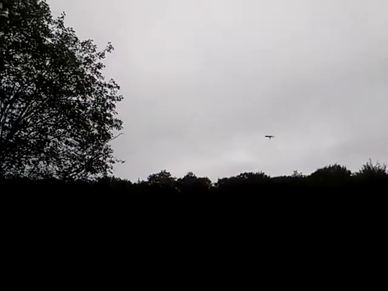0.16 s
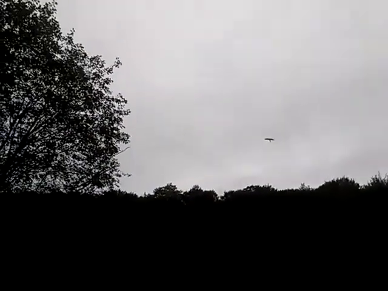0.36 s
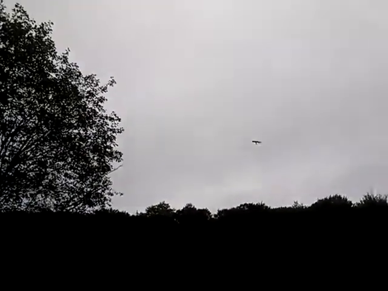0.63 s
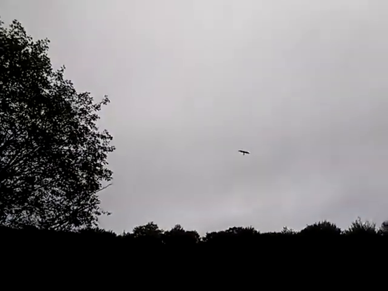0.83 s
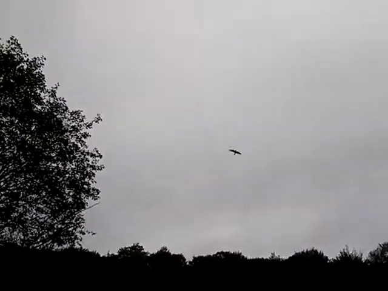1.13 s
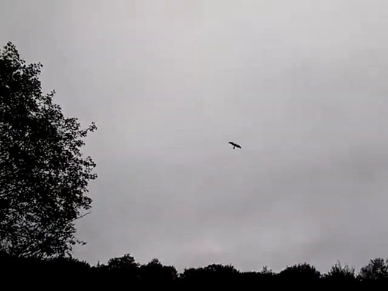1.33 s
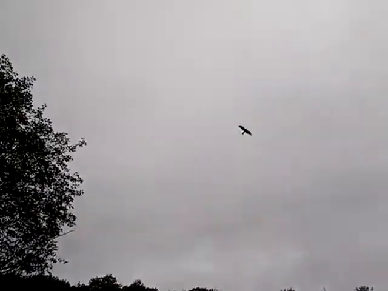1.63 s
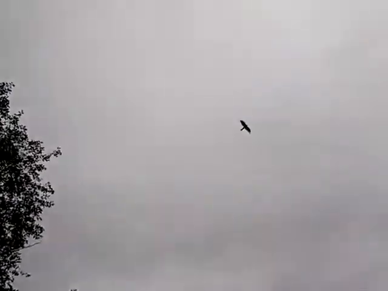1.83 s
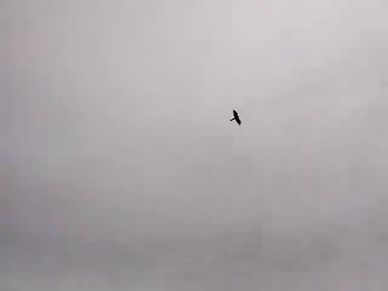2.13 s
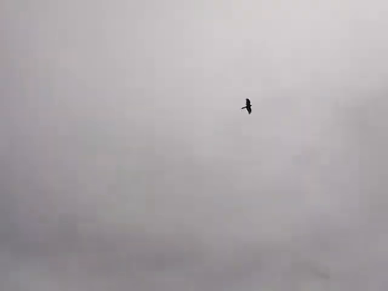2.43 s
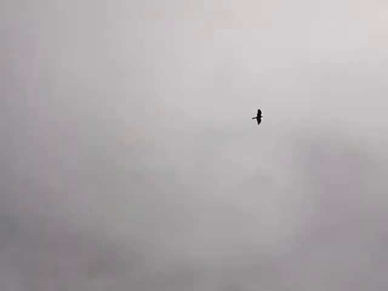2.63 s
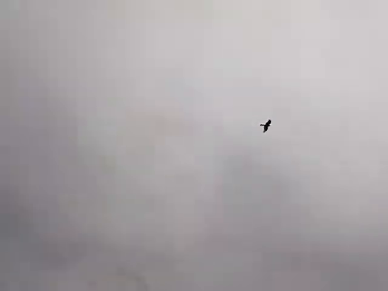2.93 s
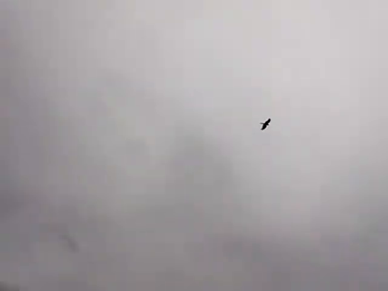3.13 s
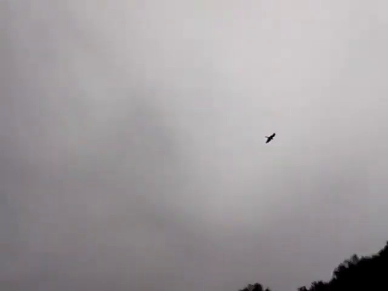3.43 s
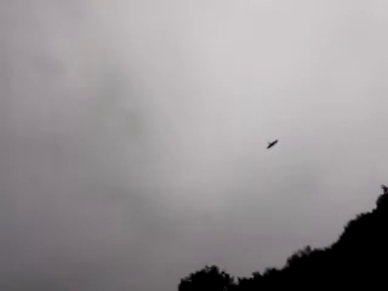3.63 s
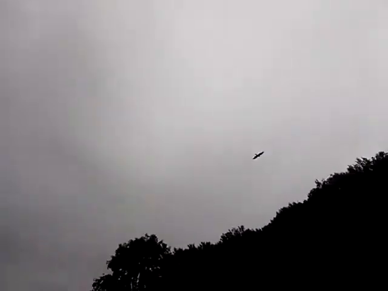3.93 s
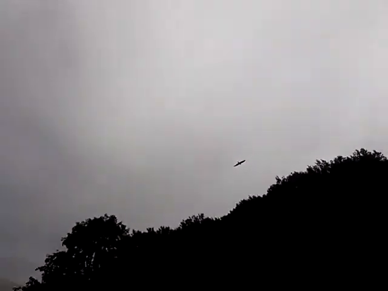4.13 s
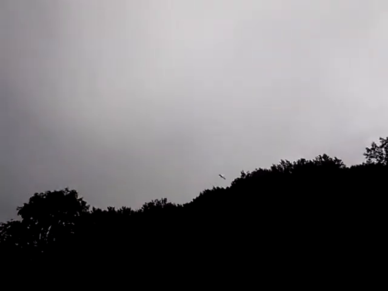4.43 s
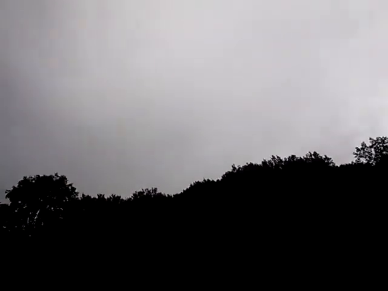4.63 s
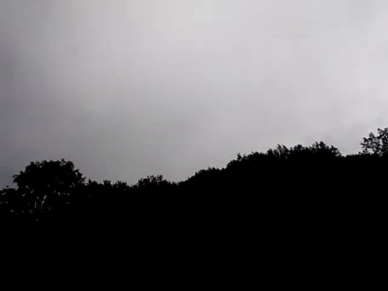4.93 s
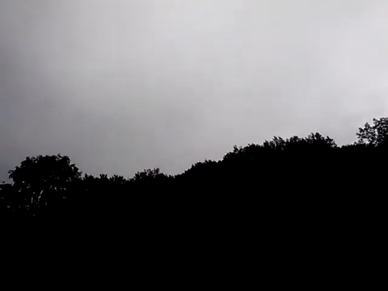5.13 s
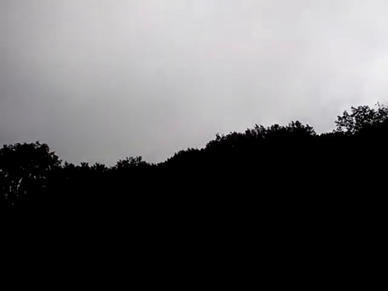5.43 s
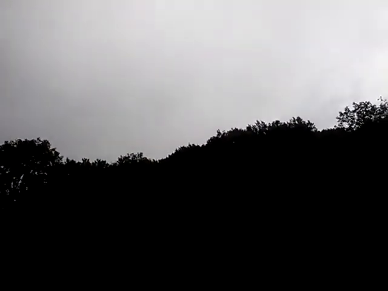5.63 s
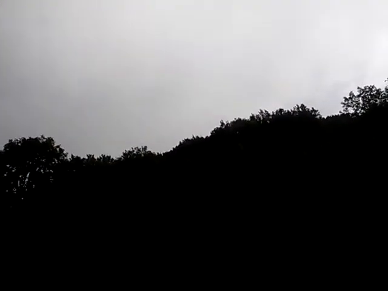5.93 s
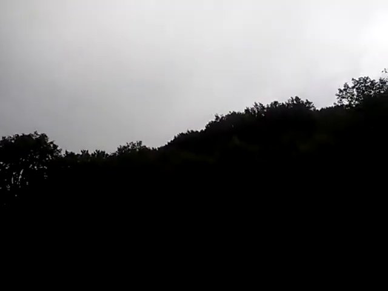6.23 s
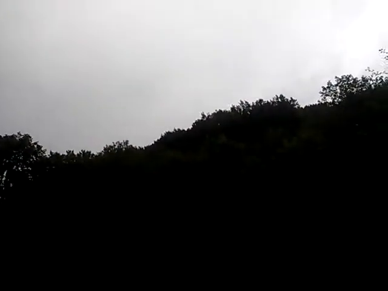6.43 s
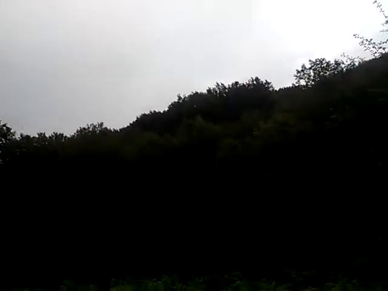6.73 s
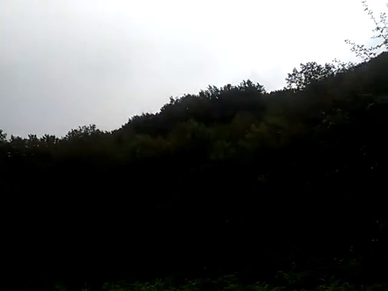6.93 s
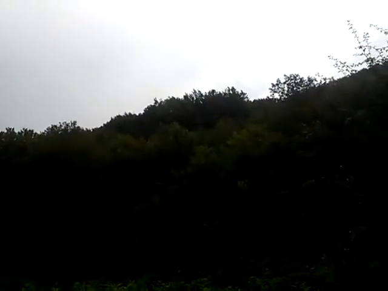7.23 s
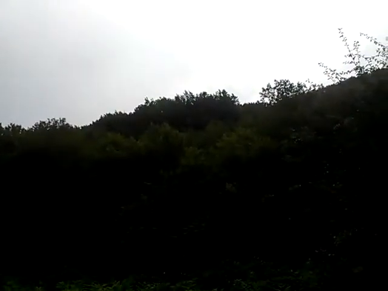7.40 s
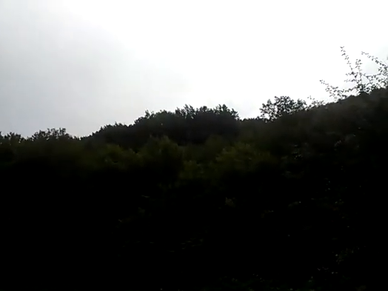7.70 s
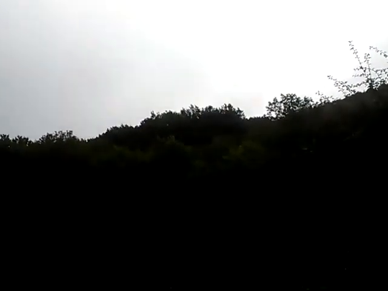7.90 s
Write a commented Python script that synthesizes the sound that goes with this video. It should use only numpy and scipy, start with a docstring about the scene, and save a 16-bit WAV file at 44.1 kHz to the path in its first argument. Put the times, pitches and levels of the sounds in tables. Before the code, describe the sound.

A soaring bird of prey gives five high arched mewing whistles over a wooded hillside, with close handling knocks, ticking plastic and late cloth rustle.

```python
"""Mewing bird of prey over a wooded hillside

A soaring bird gives five arched calls, harmonic whistles with a rough period-doubled undertone; trees and
hillside reflect them, and the last two, from low over the trees, are blurred. Close to the microphone, fingers
knock on a hand-held camera (damped swings), its case chatters (ringing modes) and clothing rustles (grainy noise).
Behind lie a hush of air and leaves (coloured noise) and the camera's faint whine (a wavering sine), in mono."""
import sys
import numpy as np
from scipy import signal
from scipy.fft import rfft, irfft, next_fast_len
from scipy.io import wavfile

SR = 44100
rng = np.random.default_rng(int(sys.argv[2]) if len(sys.argv) > 2 else 0)


def dump_mix(stems):
    """Bounce the given channels to the path in sys.argv[1] as a 16-bit WAV at rate SR."""
    frames = np.atleast_2d(stems).T  # one column per channel
    limited = np.clip(frames, -1, 1)  # hard clip at full scale
    pcm = np.round(limited * 32767).astype(np.int16)
    wavfile.write(sys.argv[1], SR, pcm)


N = 355438
TIME = np.arange(N) / SR


def undb(db):
    """Decibels to gain."""
    return 10 ** (np.asarray(db) / 20)


def unit(x):
    """Scale to rms 1."""
    return x / np.sqrt(np.mean(x ** 2))


def curve(points, t=TIME):
    """Join (seconds, value) points by straight lines."""
    seconds, values = np.transpose(points)
    return np.interp(t, seconds, values)


def tint(x, spectrum):
    """Give x a spectrum of (Hz, dB) points, joined on a logarithmic frequency axis; rms 1."""
    hz, db = np.transpose(spectrum)
    size = next_fast_len(len(x))
    f = np.maximum(np.fft.rfftfreq(size, 1 / SR), 1)
    gain = undb(np.interp(np.log(f), np.log(hz), db))
    return unit(irfft(rfft(x, size) * gain, size)[:len(x)])


def band(hz, width, size=N):
    """Noise that falls away on both sides of hz; at 0 Hz it is a random wander. Rms 1."""
    padded = next_fast_len(size)
    f = np.fft.rfftfreq(padded, 1 / SR)
    spectrum = rfft(rng.standard_normal(padded)) / (1 + ((f - hz) / width) ** 2)
    return unit(irfft(spectrum, padded)[:size])


def add(out, start, x):
    """Mix x into out from a time in seconds."""
    i = max(int(start * SR), 0)
    out[i:i + len(x)] += x[:max(len(out) - i, 0)]


def scatter(start, end, per_s, count=40):
    """Unevenly spaced moments in a spell: rows of (s, chance of strength, chance of pitch)."""
    times = start + (np.arange(count) + rng.random(count)) / per_s
    return np.column_stack([times, rng.standard_normal((count, 2))])[times < end]


def background(leaf_hz=6050, leaf_width_hz=750, whine_hz=13015, whine_db=-81.5):
    """A flickering hush of air, the hiss of far leaves, and the thin whine of the camera's electronics."""
    # Spectrum of the air and leaves. Each row: frequency in Hz, relative density in dB per Hz.
    air_colour = [(15, -42), (25, -2), (193, -8), (233, -7.5), (378, -6), (598, -4), (666, -3), (722, -3.5),
                  (1950, -3), (2700, -8), (3930, -7), (4870, -11.5), (5880, -8.5), (7100, -16),
                  (15500, -23)]
    # Loudness of that hush. Each row: time in seconds, level in dB.
    air_level = [(0, -63), (3.5, -63.5), (6, -61.5), (8.05, -63)]
    # Loudness of the far leaves. Each row: time in seconds, level in dB.
    leaf_level = [(0, -95), (2.5, -76), (2.9, -72), (8.05, -71.5)]
    flicker_db = .35 * band(0, 12)
    air = tint(rng.standard_normal(N), air_colour) * undb(curve(air_level) + flicker_db)
    leaves = band(leaf_hz, leaf_width_hz) * undb(curve(leaf_level) + flicker_db)
    wavering_hz = whine_hz + 5 * band(0, 10)
    whine = np.sqrt(2) * np.sin(2 * np.pi * np.cumsum(wavering_hz) / SR)
    return air + leaves + undb(whine_db) * whine


def rustle(grain_db=0.5, crackle_db=1.2, catch_db=1.0, growth=0.53):
    """Cloth fibres catch and let go, heard as uneven, grainy noise: long slides and short brushes."""
    # Slides of a sleeve, each gathering speed until it stops.
    # Each row: start in seconds, stop in seconds, level at the stop in dB, release in seconds.
    slides = [(6.55, 7.207, -59.5, 0.029), (7.258, 7.639, -46, 0.044), (7.636, 8.043, -70, 0.046)]
    # Spectrum of the sleeve. Each row: frequency in Hz, relative density in dB per Hz.
    sleeve_colour = [(150, -39), (400, -11.5), (800, -12), (2400, -12.5), (3700, -2), (5600, 0),
                     (7000, -4.5), (8100, -11.5), (8800, -21.5), (15000, -28)]
    # Short brushes of cloth. Each row: middle in seconds, half length in seconds, level in dB, centre in Hz.
    cloth_brushes = [(2.963, 0.0066, -61, 4740), (3.943, 0.0034, -57, 6500), (6.419, 0.032, -52, 5190),
                     (6.466, 0.062, -52.5, 4970), (6.896, .03, -59, 4900), (7.209, 0.0079, -51.5, 4850),
                     (7.296, 0.0062, -50, 3170), (7.394, 0.007, -49, 5140), (7.503, .035, -53, 6070),
                     (7.621, 0.046, -52.5, 3880), (7.754, 0.064, -60.5, 5330)]
    grain = unit(undb(grain_db * band(0, 1200) + crackle_db * band(0, 180)))

    speed = np.zeros(N)
    for start, stop, db, release in slides:
        gathering = np.clip((TIME - start) / (stop - start), 0, 1) ** growth
        dying = np.exp(-np.maximum(TIME - stop, 0) / release)
        speed += undb(db) * gathering * dying
    out = speed * tint(rng.standard_normal(N), sleeve_colour) * undb(catch_db * band(0, 35))

    t = np.arange(int(.3 * SR)) / SR
    middle = t.mean()
    for s, half_length, db, hz in cloth_brushes:
        stroke = np.exp(-((t - middle) / half_length) ** 2)
        add(out, s - middle, undb(db) * stroke * band(hz, 0.32 * hz, len(t)))
    return out * grain


def chatter(half_length_s=0.0043, slips_per_s=41, light_db=4, scatter_db=3, detune_hz=35,
            rub_db=-2, patchy_db=3, rub_fade_s=0.024):
    """Small slips swell the case's ring for a few milliseconds each, over a weak, uneven rubbed ring."""
    # Distinct slips in the camera case. Each row: middle in seconds, level in dB.
    distinct_slips = [(.082, -52), (4.546, -55), (4.566, -47), (4.579, -42.5), (4.589, -47), (4.645, -44.5),
                      (4.73, -46), (4.74, -48), (4.802, -50.5), (5.778, -55), (5.872, -58), (5.94, -51),
                      (5.951, -52), (6.893, -45.5), (7.089, -53.5), (7.207, -52), (7.333, -50),
                      (7.471, -49)]
    # What the case rings with. Each row: frequency in Hz, width in Hz, relative level in dB.
    case_modes = [(3470, 115, 2.5), (8000, 340, -19.5), (13300, 300, -25)]
    # Spells of light rubbing. Each row: start in seconds, end in seconds, base level in dB.
    rubbing_spells = [(0.019, .16, -70), (3.42, 3.5, -70.5), (4.513, 4.662, -58), (4.728, 4.842, -61.5),
                      (5.738, 5.79, -63), (5.819, 6.079, -69.5), (6.108, 6.564, -61.5),
                      (6.867, 6.96, -59.5), (7.057, 7.095, -61.5), (7.179, 7.227, -60),
                      (7.28, 7.385, -60.5), (7.45, 8.056, -72.5)]
    light_slips = []
    for start, end, db in rubbing_spells:
        for s, strength, _ in scatter(start, end, slips_per_s):
            light_slips.append((s, db + light_db + scatter_db * strength))

    slips, t = np.zeros(N), np.arange(int(0.035 * SR)) / SR
    middle = t.mean()
    swell = np.exp(-((t - middle) / half_length_s) ** 2)
    for s, db in [*distinct_slips, *light_slips]:
        turn, detune = rng.standard_normal(2)  # starting phase in turns, shared shift of the modes
        ring = sum(undb(mode_db) * np.sin(2 * np.pi * ((hz + detune_hz * detune) * t + turn))
                   for hz, _, mode_db in case_modes)
        add(slips, s - middle, undb(db) * swell * ring)

    pressure = np.zeros(N)
    for start, end, db in rubbing_spells:
        time_outside = abs(TIME - np.clip(TIME, start, end))
        pressure = np.maximum(pressure, undb(db) * np.exp(-time_outside / rub_fade_s))
    rubbed = sum(undb(db) * band(hz, width) for hz, width, db in case_modes)
    return slips + rubbed * pressure * undb(rub_db + patchy_db * band(0, 29))


def knocks(rise_cycles=0.26, thud_db=-11, thud_ratio=0.604, thud_decay_s=0.0089, flurry_per_s=44, flurry_hz=292,
           scatter_db=1.0, pitch_scatter=0.49, grip_db=-81, grip_swing_db=4.0):
    """Each knock swings the camera body for about a cycle, with a brief lower thud; the grip murmurs throughout."""
    # Distinct finger knocks on the camera body. Each row: start in seconds, level in dB, pitch in Hz.
    distinct_knocks = [(0.364, -46.5, 233), (.4222, -50, 243), (.69, -42.5, 218), (0.7212, -45.5, 257),
                       (.862, -56, 129), (1.7897, -36.5, 268), (1.796, -36.5, 477), (1.8228, -41, 368),
                       (1.8805, -44, 388), (1.962, -42.5, 400), (2.0315, -43.5, 420), (2.1533, -45, 305),
                       (2.5498, -38, 363), (2.768, -45, 395), (2.8457, -41.5, 332), (3.2827, -55, 230),
                       (3.8855, -42.5, 276), (3.9831, -45.5, 258), (4.2036, -43, 516), (4.3688, -42, 308),
                       (5.4072, -49, 410), (5.4536, -53.5, 148), (5.715, -38, 355), (7.348, -49, 280),
                       (7.6478, -43.5, 226)]
    # The grip shifts in flurries of lighter knocks. Each row: start in seconds, end in seconds, typical level in dB.
    grip_flurries = [(1.836, 2.06, -45), (2.094, 2.235, -49), (2.517, 2.65, -48), (2.736, 2.87, -49.5),
                     (3.985, 4.015, -46.5)]
    light_knocks = []
    for start, end, db in grip_flurries:
        for s, strength, pitch in scatter(start, end, flurry_per_s):
            hz = flurry_hz * np.exp(pitch_scatter * np.tanh(pitch))
            light_knocks.append((s, db + scatter_db * strength, hz))

    out, t = np.zeros(N), np.arange(int(0.064 * SR)) / SR
    for s, db, hz in [*distinct_knocks, *light_knocks]:
        age = t * hz / rise_cycles
        swing = age * np.exp(1 - age) * np.cos(2 * np.pi * hz * t)
        # the thud follows the pitch of the knock, and a firmer grip raises it
        firmness = rng.standard_normal()
        thud_hz = thud_ratio * hz * np.exp(0.17 * firmness)
        thud = np.exp(-t / thud_decay_s) * np.sin(2 * np.pi * thud_hz * t)
        add(out, s, undb(db) * (swing - undb(thud_db) * thud))
    body = signal.sosfilt(signal.butter(1, 40, "high", fs=SR, output="sos"), out)
    grip = undb(grip_db) * unit(band(150, 210) * undb(grip_swing_db * band(0, 16)))
    return body + grip


def brighten(x, hz):
    """Leaves throw back the short waves best: a gentle high-pass."""
    return signal.sosfilt(signal.butter(1, hz, "high", fs=SR, output="sos"), x)


def echoes(x, t60, delay, top_hz):
    """Countless weak reflections off trunks and leaves, building up, fading away and dull in the treble."""
    t = np.arange(int(t60 * SR)) / SR
    response = rng.standard_normal(len(t)) * undb(-60 * t / t60) * (1 - np.exp(-t / delay))
    response /= np.linalg.norm(response)
    response = signal.sosfilt(signal.butter(2, top_hz, fs=SR, output="sos"), response)
    return signal.fftconvolve(x, response)[:N]


def reflections(x, spread, count=24, first=.005, fade=0.36, doppler=.016):
    """Single trees return the call, each with its own delay [s] and, as the bird flies, a slight pitch shift."""
    t = np.arange(len(x) + int(.15 * SR)) / SR
    # a finer time grid keeps the treble when reading between samples
    fine = signal.resample_poly(x, 4, 1)
    fine_t = np.linspace(0, len(x) / SR, len(fine), endpoint=False)
    out = np.zeros(len(t))
    for k, (place, bearing) in enumerate(rng.random((count, 2))):
        delay = first + spread * (k + place) / count
        moving_delay = delay + doppler * (2 * bearing - 1) * (t - t.mean())
        out += np.exp(-delay / fade) * np.interp(t - moving_delay, fine_t, fine, 0, 0)
    out = brighten(out, hz=6040)
    return out * np.linalg.norm(x) / np.linalg.norm(out)


def mew(t, hz, voice, jitter=0.0032, waver=0.0019, undertone_width_hz=210, onset_db=-24, ending_db=-14,
        soft_share=0.24, soft_share_per_harmonic=0.37, strain_range=0.015, strain_lasts=0.7, ragged_db=3,
        upper_undertone_db=3.5, opening_s=0.019, closing_s=.01):
    """One call: a harmonic whistle with a trembling pitch, doubling its period near the top of the arch."""
    # What throat and open beak pass of each harmonic. Each row: frequency in Hz, gain in dB.
    throat_gain = [(1300, -8.5), (1600, -13), (1750, -10), (2600, -10.5), (3150, -10), (3350, -5.5),
                   (3520, 1), (3900, 13), (4700, -1), (5300, 0), (5700, -9), (6350, -8), (7000, -4.5),
                   (7700, -22), (8200, -19.5), (8750, -10), (9400, -26), (10500, -22.5), (12300, -48.5)]
    (level_db, attack, release, first_db, second_db, fourth_db, overtone_db,
     undertone_db, breath_db, flutter_db) = voice
    size = len(t)
    since_start, until_end = t - t[0], t[-1] - t
    pitch = hz * (1 + jitter * band(0, 170, size) + waver * band(0, 27.6, size))
    phase = 2 * np.pi * np.cumsum(pitch) / SR

    # effort rises, holds and falls; a soft voice is poor in overtones
    effort_db = onset_db * np.exp(-since_start / attack) + ending_db * np.clip(1 - until_end / release, 0, 1)
    throat_hz, throat_db = np.transpose(throat_gain)
    harmonics_db = [first_db, second_db, 0, fourth_db, overtone_db, overtone_db, overtone_db]
    tone = np.zeros(size)
    for k, source_db in enumerate(harmonics_db, 1):
        passed_db = np.interp(np.log(k * hz), np.log(throat_hz), throat_db)
        db = source_db + passed_db + effort_db * (soft_share + soft_share_per_harmonic * k)
        # moving air makes each harmonic flutter on its own
        tone += undb(db + flutter_db * band(0, 34, size)) * np.sin(k * phase)

    # the doubling sets in at the top and lingers on the way down
    tension = hz + strain_lasts * (np.maximum.accumulate(hz) - hz)
    strain = np.exp((tension / hz.max() - 1) / strain_range) * undb(undertone_db + effort_db)
    # its lines halfway between the harmonics are ragged
    between = np.zeros(size)
    for k, db in [(2, -upper_undertone_db), (3, upper_undertone_db)]:
        raggedness = (0.77 + band(0, undertone_width_hz, size)) * undb(db + ragged_db * band(0, 22, size))
        between += np.sin((k + .5) * phase) * raggedness

    rasp = undb(breath_db) * band(0, 660, size)
    edges = np.clip(np.minimum(since_start / opening_s, until_end / closing_s), 0, 1)
    return np.sqrt(2) * undb(level_db) * edges * (tone * (1 + rasp) + strain * between)


def bird(hillside_lag_s=.08, carry_range=0.34):
    """The calls, their quick reflections from the tree tops and the later, long wash from the hillside."""
    # The pitch arch of each call. Each row is one call, a list of points: time in seconds, pitch in Hz.
    pitch_arches = [
        [(.25, 1320), (.305, 1535), (.35, 1628), (.46, 1740), (.615, 1777), (.68, 1746), (.78, 1728),
         (.835, 1626), (.865, 1510)],
        [(1.622, 1305), (1.668, 1580), (1.7, 1653), (1.75, 1705), (1.8, 1713), (1.85, 1747), (1.935, 1737),
         (2.07, 1621), (2.13, 1510)],
        [(3.77, 1285), (3.8, 1420), (3.845, 1561), (4.03, 1623), (4.08, 1568), (4.115, 1596), (4.195, 1470)],
        [(4.83, 1290), (4.865, 1480), (4.91, 1585), (5.05, 1705), (5.19, 1741), (5.24, 1750), (5.315, 1703),
         (5.35, 1621), (5.415, 1478)],
        [(6.035, 1372), (6.075, 1543), (6.135, 1660), (6.19, 1716), (6.29, 1751), (6.39, 1662), (6.44, 1744),
         (6.54, 1524)],
    ]
    # The voice in each call. Each row: level in dB, attack in seconds, release in seconds, then in relative dB:
    # fundamental, second harmonic, fourth harmonic, overtones above it, half-pitch undertone, breathiness, flutter.
    call_voices = [(-42.5, 0.049, 0.024, -5, -2, 1, -3.5, -14.5, -33, 2),
                   (-43, 0.026, 0.024, 1, 3.5, 3, 1, -19.5, -28, 2.2),
                   (-45.5, 0.027, 0.052, -3.5, -0.5, -3, -4, -36, -25, 3),
                   (-46, 0.025, 0.012, 0, 0, 1, -1, -22, -25, 2),
                   (-48, 0.024, 0.037, -1.5, -6.5, -0.5, -3.5, -26, -28, 3)]
    # How the wood answers each call. Each row: tree tops in dB re the direct call, spread of their delays
    # in seconds, hillside in dB.
    wood_answers = [(-13.5, 0.053, -19.5), (-15.5, 0.058, -19.5), (-11, 0.047, -21), (-2, .05, -16),
                    (-1.5, .062, -11.5)]
    near, far = np.zeros(N), np.zeros(N)
    for arch, voice, (trees_db, spread, hillside_db) in zip(pitch_arches, call_voices, wood_answers):
        t = np.arange(int(arch[0][0] * SR), int(arch[-1][0] * SR)) / SR
        hz = curve(arch, t)
        call = mew(t, hz, voice)
        # the shrill top of the arch carries farthest
        carried = call * np.exp((hz / hz.max() - 1) / carry_range)
        # the stronger the trees answer, the weaker the direct call and its reflections are set
        direct = 1 / np.hypot(1, undb(trees_db))
        add(near, t[0], direct * call)
        add(near, t[0], direct * undb(trees_db) * reflections(carried, spread))
        add(far, t[0] + hillside_lag_s, undb(hillside_db) * carried)
    return near + echoes(brighten(far, hz=3180), t60=0.71, delay=0.014, top_hz=6100)


def scene():
    """Everything reaches one microphone, alike in both channels."""
    mono = background() + rustle() + chatter() + knocks() + bird()
    return np.array([mono, mono])


def record(dry, top_hz=15750):
    """The camera cuts the top: a steep low-pass."""
    return signal.sosfilt(signal.ellip(10, .2, 70, top_hz, fs=SR, output="sos"), dry)


dry = scene()
out = record(dry)
dump_mix(out)
```